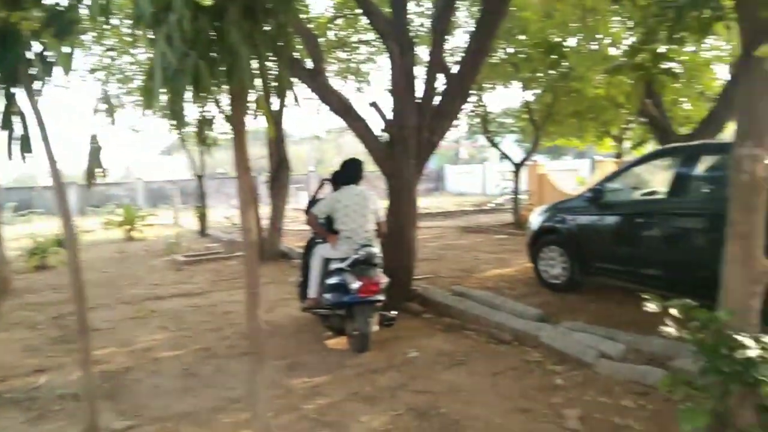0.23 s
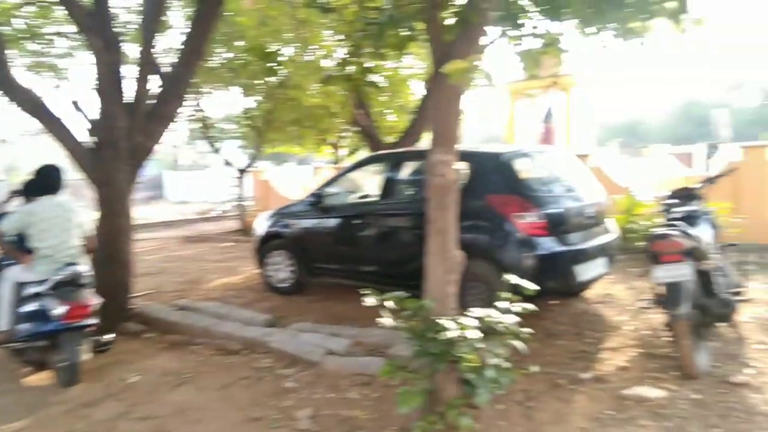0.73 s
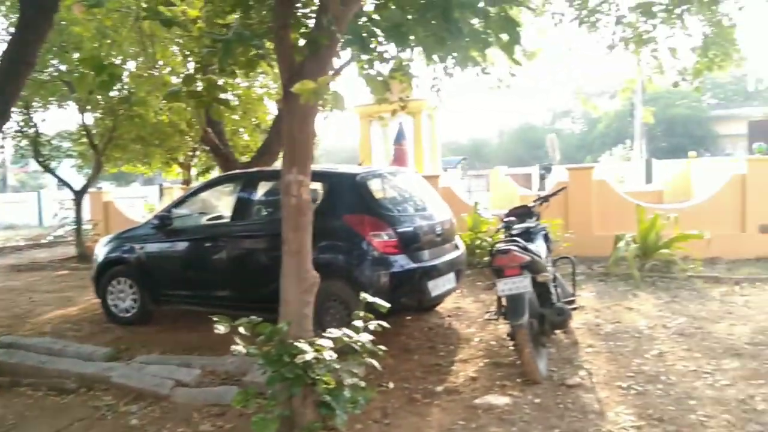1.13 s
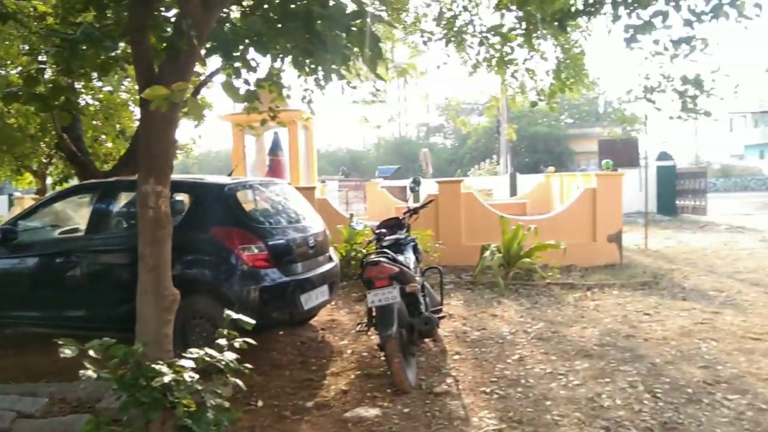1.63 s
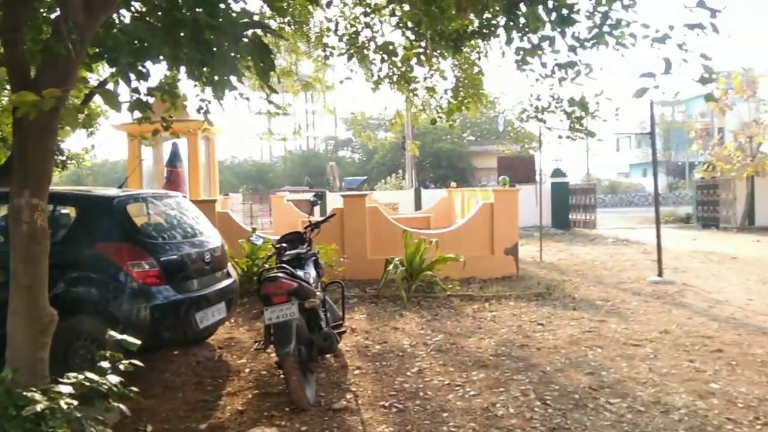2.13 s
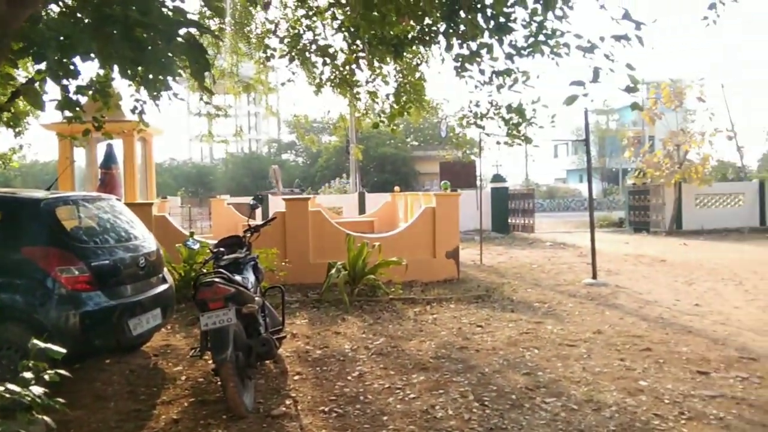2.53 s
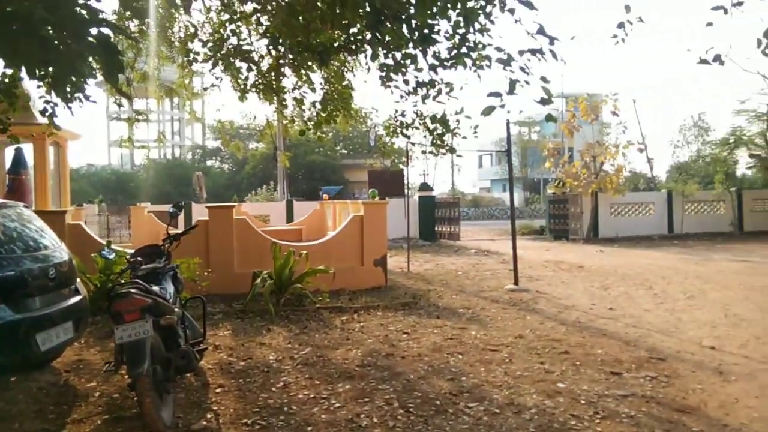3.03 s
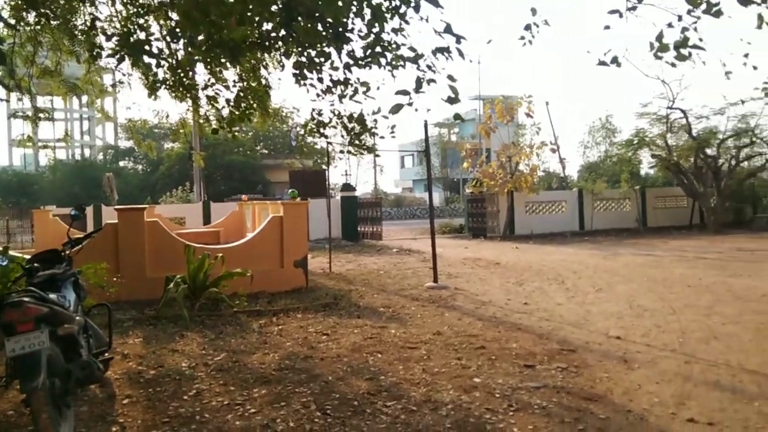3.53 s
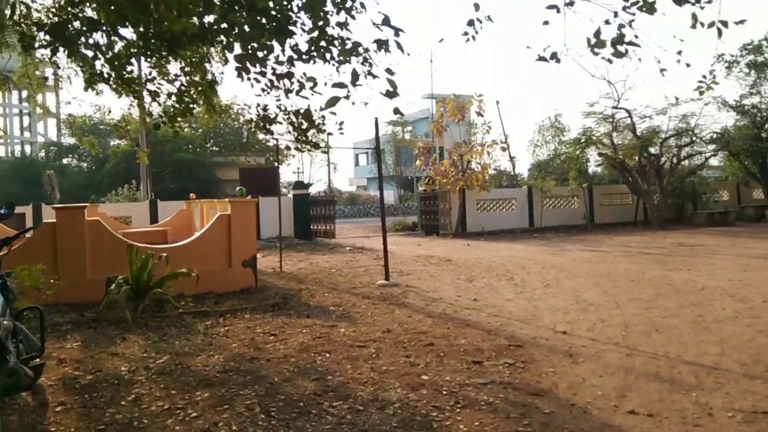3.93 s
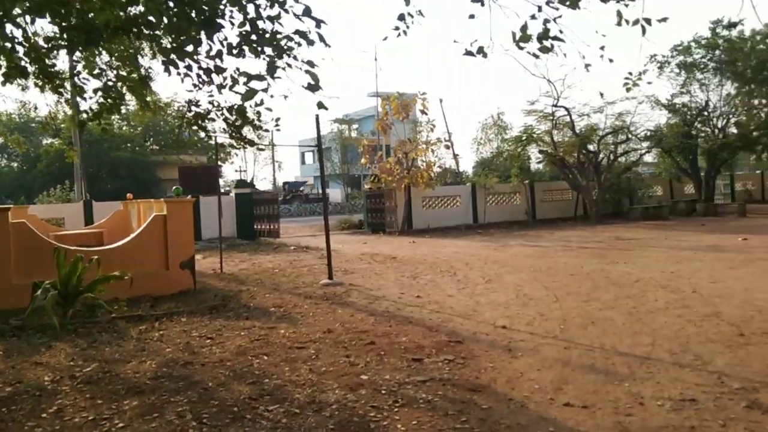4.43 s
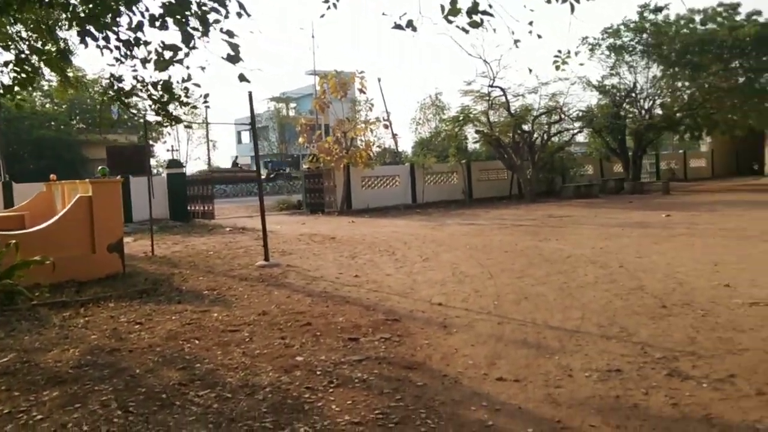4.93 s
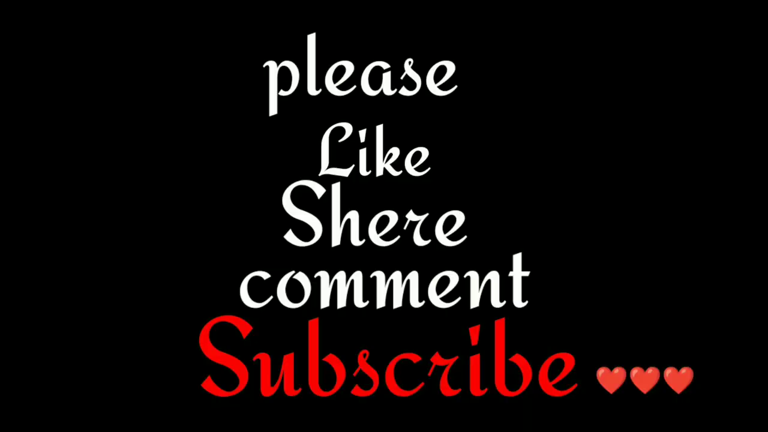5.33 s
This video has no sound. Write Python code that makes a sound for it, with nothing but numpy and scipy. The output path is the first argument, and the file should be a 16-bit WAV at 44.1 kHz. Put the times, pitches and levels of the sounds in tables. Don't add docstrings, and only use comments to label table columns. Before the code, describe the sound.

A constant shimmering insect drone hangs overhead, with one thin singer standing out early. Close to the phone microphone a small scooter runs steadily, low and fluttering, with light clatter and hiss. Its rapid metallic ticking swells in the middle, then drops away as the scooter rolls off and slows. A far engine, weak hum and low road rumble remain beneath. Open air, little echo, nearly mono, with a hard cut at five seconds.

```python
import sys
import numpy as np
from scipy import signal
from scipy.fft import rfft, irfft, next_fast_len
from scipy.io import wavfile
from scipy.ndimage import map_coordinates

SR = 44100
rng = np.random.default_rng(int(sys.argv[2]) if len(sys.argv) > 2 else 0)


def waveform_to_disk(signal):
    frames = np.transpose(np.atleast_2d(signal))
    scaled = np.clip(frames, -1, 1) * 32767
    samples = np.round(scaled).astype(np.int16)
    wavfile.write(sys.argv[1], SR, samples)


def voltage_ratio(level):
    return 10 ** (np.asarray(level, float) / 20)


N = 246017
CUT_S = 5.0605
TICK_FIRST_S, TICKS_PER_S = 0.0045, 53.61

# (time [s], level [dB])
ROAD_LEVEL = [(0.0, -45), (0.01, -40.5), (0.68, -41.5), (0.69, -39), (1.24, -42), (1.3, -36), (1.31, -40),
              (1.48, -43.5), (1.52, -39), (2.08, -41), (2.13, -39.5), (2.21, -47.5), (2.28, -37.5),
              (2.35, -41.5), (2.52, -37), (2.56, -42.5), (2.83, -39), (3.0, -42), (4.58, -42),
              (4.64, -38.5), (4.67, -44.5), (4.89, -40.5), (5.05, -50), (5.06, -54)]
# (frequency [Hz], density [dB per Hz])
ROAD_SPECTRUM = [(16, -41), (28, -11.5), (86, -5.5), (114, -0.5), (467, -10), (700, -24.5), (910, -54.5),
                 (1540, -120)]
# (time [s], frequency [Hz], level [dB])
PUMP_HUM = [(0.0, 80, -43), (0.08, 76.2, -41), (1.37, 76.0, -46), (1.47, 79.3, -52.5), (1.82, 78.64, -53),
            (1.89, 76.2, -46), (1.92, 72.8, -58), (1.99, 71.9, -53), (2.1, 78.2, -56.5),
            (2.86, 74.66, -47.5), (3.03, 76.4, -56), (3.13, 75.8, -48), (3.27, 76.2, -54),
            (3.35, 75.5, -39), (3.59, 78.5, -55), (3.68, 78.0, -40), (3.78, 75, -58), (3.86, 75.9, -48),
            (4.19, 78.74, -50), (4.42, 78.2, -54), (4.51, 74.45, -48), (4.82, 74.65, -52),
            (4.99, 74.8, -45), (5.06, 74.7, -57)]
# (time [s], firing rate [Hz], multiple 4 [dB], multiple 5 [dB], multiple 6 [dB])
FAR_ENGINE = [(2.9, 34.5, -47, -45, -54), (3.03, 34.17, -54, -63, -41), (3.06, 34.36, -40, -50, -50),
              (3.23, 34.92, -43, -38, -42), (3.33, 33.51, -48, -37.5, -36), (3.6, 33.3, -49, -56, -48.5),
              (3.8, 32.54, -34, -41, -40), (3.89, 32.96, -38, -43, -53), (4.04, 31.44, -42.5, -46, -47),
              (4.08, 31.6, -46, -41, -58), (4.13, 32.4, -42, -62, -44), (4.2, 32.41, -39.5, -42, -58),
              (4.75, 32.04, -51, -61.5, -51), (4.78, 32.04, -45, -41, -51), (4.98, 32.8, -40, -55, -49),
              (5.06, 32.8, -60, -65, -60)]
# (time [s], level [dB], centre [Hz])
CHORUS_LEVEL = [
    (0.0, -23.5, 5331),
    (0.91, -26.5, 5318),
    (1.85, -25.5, 5393),
    (1.99, -27, 5380),
    (3.02, -27, 5481),
    (3.42, -26.5, 5340),
    (4.04, -33.5, 5343),
    (4.96, -31.5, 5357),
    (5.05, -40, 5291),
    (5.06, -51, 5290),
]
# (frequency [Hz], density [dB per Hz])
TYMBAL_SPECTRUM = [(2240, -46), (3800, -24), (4200, -26.5), (4500, -15.5), (4650, -11), (4980, -3),
                   (5280, 1.5), (5530, -0.5), (6050, -5), (6770, -9.5), (7730, -18.5), (9000, -29.5),
                   (11700, -49.5), (19800, -120)]
# (time [s], frequency [Hz], level [dB])
NEAR_SINGER = [
    (0.3, 6349, -41),
    (0.65, 6340, -40.5),
    (0.692, 6357, -32.5),
    (0.75, 6350, -38.5),
    (0.896, 6380, -38),
    (0.914, 6350, -35),
    (1.062, 6356, -39),
    (1.138, 6360, -39),
    (1.17, 6355, -46),
    (1.3, 6376, -37.5),
]
# (time [s], bright hiss [dB], body clatter [dB])
GEAR_LEVEL = [(0.0, -45, -34), (0.01, -45, -41), (0.49, -42.5, -39), (0.65, -47, -42.5), (0.7, -43, -39),
              (1.1, -48.5, -40.5), (1.32, -43, -37.5), (1.55, -42, -37), (1.9, -40.5, -37),
              (2.03, -43, -37.5), (2.23, -40, -37), (2.31, -42, -36.5), (2.47, -48.5, -38.5),
              (2.64, -51, -41), (3.65, -56.5, -43.5), (4.37, -56.5, -41.5), (4.83, -56, -40.5),
              (4.89, -55.5, -40.5), (4.92, -63, -39.5), (5.02, -130, -46), (5.05, -139, -49),
              (5.06, -139, -59)]
# (frequency [Hz], density [dB per Hz])
HISS_SPECTRUM = [(5000, -30), (6800, -5), (7700, 1.5), (8400, -9.5), (9600, -5.5), (10700, -10),
                 (12000, -25), (13500, -28), (15500, -32), (17000, -61)]
# (frequency [Hz], density [dB per Hz])
CLATTER_SPECTRUM = [(290, -29.5), (500, -2.5), (642, -6.5), (733, -6.5), (900, -2), (1370, -6.5),
                    (2290, -3), (2740, -5.5), (3130, -8), (3980, -8), (4200, -6.5), (5460, -32),
                    (9240, -120)]
# (time [s], level [dB])
TICK_LEVEL = [(0.004, -38), (0.098, -36.5), (0.191, -39.5), (0.284, -56), (0.378, -53.5), (0.471, -44),
              (0.564, -43), (0.657, -41.5), (0.751, -42), (0.844, -40), (0.937, -41.5), (1.03, -38),
              (1.124, -29), (1.217, -31.5), (1.31, -30), (1.403, -23), (1.497, -26.5), (1.59, -31),
              (1.683, -30.5), (1.777, -24.5), (1.87, -27.5), (1.963, -32.5), (2.056, -32), (2.15, -34),
              (2.243, -26.5), (2.336, -31.5), (2.429, -34.5), (2.523, -47)]
# (frequency [Hz], density [dB per Hz])
TICK_SPECTRUM = [(1500, -41.5), (2800, -14), (3500, -20), (4200, -5.5), (6000, -9.5), (7600, -3),
                 (8800, -2), (9300, -2.5), (10600, -2.5), (11400, -12.5), (12000, -6.5), (13200, -24),
                 (15500, -33), (17000, -59.5)]
# (time [s], firing rate [Hz], multiple 1 [dB], multiple 2 [dB], multiple 3 [dB], multiple 4 [dB])
EXHAUST_NOTE = [(0.0, 53.7, -45, -33, -38, -46), (0.37, 53.9, -44, -32, -34.5, -47.5),
                (0.38, 53.7, -45, -35, -33.5, -50), (0.49, 53.6, -36.5, -43.5, -35.5, -46),
                (0.61, 53.0, -50.5, -36, -46, -56), (0.72, 53.4, -43, -36, -47.5, -48.5),
                (0.86, 53.63, -50, -48.5, -37.5, -46), (0.94, 53.7, -51, -35.5, -53, -41.5),
                (1.0, 53.67, -51, -36.5, -48, -51), (1.25, 53.8, -51, -37, -41, -40.5),
                (1.31, 53.7, -44, -34.5, -35.5, -61), (1.35, 53.67, -38, -29.5, -44, -48.5),
                (1.54, 53.9, -42.5, -34.5, -41, -42.5), (1.58, 53.6, -42.5, -36, -34, -48),
                (1.76, 53.75, -42, -29.5, -50, -44), (1.85, 53.48, -60.5, -32.5, -36, -45),
                (1.89, 53.7, -45.5, -30, -45, -39), (2.04, 53.74, -51, -42.5, -43, -53.5),
                (2.14, 53.68, -60.5, -35, -47.5, -40), (2.21, 53.85, -44, -27, -33.5, -43.5),
                (2.28, 53.6, -39, -31, -41, -52), (2.31, 53.74, -41, -28.5, -34, -46.5),
                (2.54, 53.6, -51, -48, -42, -45), (2.56, 53.53, -47, -30.5, -47, -49),
                (2.69, 52, -37, -43, -59, -49), (2.76, 51.53, -51, -49, -59, -45.5),
                (2.9, 52.4, -41, -40, -43, -48), (3.03, 52.06, -47, -36, -50, -41.5),
                (3.11, 51.85, -39, -33.5, -41, -61), (3.18, 51.37, -43, -33.5, -43.5, -48),
                (3.33, 53.1, -46, -34.5, -38.5, -48), (3.42, 50.1, -49, -43, -45.5, -44),
                (3.48, 51, -41, -44, -38, -48.5), (3.56, 50.77, -57.5, -41, -65, -42),
                (3.65, 50.2, -39, -40, -40, -56), (3.72, 50.1, -46, -38.5, -42, -45),
                (4.06, 49.68, -42, -41, -49, -48), (4.16, 45.62, -51, -38, -44, -49),
                (4.31, 45.54, -45, -45, -39, -50), (4.41, 46.96, -48, -41, -49, -46),
                (4.44, 46.77, -42.5, -41, -46, -41), (4.5, 48.9, -51, -40, -50, -63),
                (4.52, 49.55, -48, -42, -47, -52), (4.59, 46.73, -51, -39.5, -54, -48),
                (4.8, 47.6, -41, -53, -44, -46.5), (4.86, 47.4, -54, -42, -45, -47),
                (4.93, 46.77, -45, -54, -42, -48), (5.02, 47.0, -57, -48, -62, -53),
                (5.06, 47.0, -59, -61, -49, -62)]
# (multiple of firing rate [count], level above multiple 4 [dB])
EXHAUST_UPPER = [(5, -4.5), (6, -4.5), (7, -11), (8, -12), (9, -12)]
# (time [s], low edge [Hz], high edge [Hz], level [dB])
STEREO_SLIPS = [
    (2.745, 4200, 7600, -36.5),
    (3.372, 7500, 9650, -52),
]


def rms_one(x):
    return x / np.sqrt(np.mean(x ** 2) + 1e-20)


def in_time(rows):
    s, *columns = np.transpose(rows)
    t = np.arange(N) / SR
    return [np.interp(t, s, column) for column in columns]


def only(rows, edge_s=0.069):
    first, last = rows[0][0], rows[-1][0]
    corners = [first - edge_s, first, last, last + edge_s]
    return np.interp(np.arange(N) / SR, corners, [0, 1, 1, 0])


def colour(x, points):
    size = next_fast_len(N)
    hz, db = np.transpose(points)
    bin_hz = np.arange(size // 2 + 1) * SR / size
    gain = voltage_ratio(np.interp(np.log(bin_hz + 1), np.log(hz), db))
    return irfft(rfft(x, size) * rms_one(gain), size)[:N]


def drift(rate):
    r = np.exp(-80 * np.pi * rate / SR)
    slow = signal.lfilter([1], [1, -2 * r, r * r], rng.standard_normal(N // 40 + 2002))
    slow = slow[2000:]
    return np.interp(np.arange(N) / 40, np.arange(len(slow)), rms_one(slow))


def patchy(low_hz, octaves, together_db, own_db, rate):
    edges = low_hz * 2 ** np.arange(0, octaves, 1 / 3)
    out, shared, white = 0, drift(rate / 3), rng.standard_normal((2, N))
    for k, (low, high) in enumerate(zip(edges, edges[1:])):
        sos = signal.butter(2, [low, min(high, 0.47 * SR)], "band", fs=SR, output="sos")
        band = signal.sosfilt(sos, white[k % 2])
        out = out + band * voltage_ratio(together_db * shared + own_db * drift(rate))
    return out


def tones(turns, levels, shake_db, wander):
    out = 0
    for k, db in levels:
        level = np.sqrt(2) * voltage_ratio(db + shake_db * drift(12))
        out = out + level * np.sin(2 * np.pi * k * turns + wander * drift(6))
    return out


def far_traffic():
    hz, *db = in_time(FAR_ENGINE)
    engine = tones(np.cumsum(hz) / SR, enumerate(db, start=4), shake_db=1.0, wander=0.35)
    hum_hz, hum_db = in_time(PUMP_HUM)
    hum = tones(np.cumsum(hum_hz) / SR, [(1, hum_db)], shake_db=-1.5, wander=0.3)
    road_db, = in_time(ROAD_LEVEL)
    rumble = rms_one(colour(patchy(24.98, 5.4, 0.68, 1.3, 8), ROAD_SPECTRUM))
    return only(FAR_ENGINE) * engine + hum + voltage_ratio(road_db + 3.0) * rumble


def insect_chorus():
    db, centre_hz = in_time(CHORUS_LEVEL)
    sizes = voltage_ratio(2.0 * rng.exponential(1, N)) * rng.choice([-1, 1], N)
    clicks = rms_one(sizes * (rng.random(N) < 5000 / SR))
    blur = rms_one(patchy(3180, 1.8, 0.5, 0.97, 12))
    mass = rms_one(colour(0.5 * clicks + blur, TYMBAL_SPECTRUM))
    place = np.cumsum(centre_hz / np.mean(centre_hz[:round(CUT_S * SR)]))
    mass = map_coordinates(mass, [place], order=3, mode="wrap")
    return voltage_ratio(db - 0.32) * mass


def near_insect():
    hz, db = in_time(NEAR_SINGER)
    return only(NEAR_SINGER) * tones(np.cumsum(hz) / SR, [(1, db)], shake_db=5.0, wander=0.55)


def running_gear(turns):
    hiss_db, clatter_db = in_time(GEAR_LEVEL)
    hiss = rms_one(colour(patchy(4500, 2.1, 0.55, 1.1, 11), HISS_SPECTRUM))
    beat = 1 + 0.14 * np.cos(2 * np.pi * turns)
    clatter = rms_one(colour(beat * patchy(350, 4.1, 0.64, 1.1, 9.1), CLATTER_SPECTRUM))
    return voltage_ratio(hiss_db + 3.5) * hiss + voltage_ratio(clatter_db + 0.85) * clatter


def valve_ticks():
    cycle = (np.arange(N) / SR - TICK_FIRST_S) * TICKS_PER_S
    k = np.round(cycle).astype(int)
    luck = rng.standard_normal((k.max() + 1, 3))
    ms = (cycle - k) * 1000 / TICKS_PER_S - 0.33 * luck[k, 0]
    puff = np.exp(-np.abs(ms / np.where(ms < 0, 1.7, 1.9)) ** 2.6)
    scatter = 0.12 * np.exp(-ms / 3.0) * (ms > 0)
    db, = in_time(TICK_LEVEL)
    gain = (puff + scatter) * voltage_ratio(db + 3.5 + 2.55 * luck[k, 1]) * only(TICK_LEVEL)
    air = rng.standard_normal(N) * gain
    dull = signal.sosfilt(signal.butter(2, 9500, fs=SR, output="sos"), air)
    slant = np.clip(0.39 + 0.35 * luck[k, 2], 0, 1)
    return colour(air - slant * (air - dull), TICK_SPECTRUM)


def exhaust():
    hz, *db = in_time(EXHAUST_NOTE)
    turns = np.cumsum(hz) / SR
    levels = list(enumerate(db, start=1))
    levels += [(k, db[3] + up_db) for k, up_db in EXHAUST_UPPER]
    return tones(turns, levels, shake_db=1.0, wander=0.26), turns


def scene():
    note, turns = exhaust()
    scooter = note + valve_ticks() + running_gear(turns)
    one = scooter + far_traffic() + insect_chorus() + near_insect()
    return np.array([one, one])


def top_cut(x):
    return signal.sosfilt(signal.butter(12, 15720, fs=SR, output="sos"), x)


def record(dry):
    t = np.arange(N) / SR
    mix = dry * np.clip((CUT_S - t) / 0.0015, 0, 1)
    for s, low_hz, high_hz, db in STEREO_SLIPS:
        sos = signal.butter(6, [low_hz, high_hz], "band", fs=SR, output="sos")
        band = rms_one(signal.sosfilt(sos, rng.standard_normal(N)))
        gate = np.clip((0.02 - np.abs(t - s)) / 0.006, 0, 1)
        mix = mix + voltage_ratio(db) * band * gate * [[1], [-1]]
    mix = signal.sosfilt(signal.butter(2, 38, "high", fs=SR, output="sos"), mix)
    return top_cut(mix)


dry = scene()
out = record(dry)
waveform_to_disk(out)
```